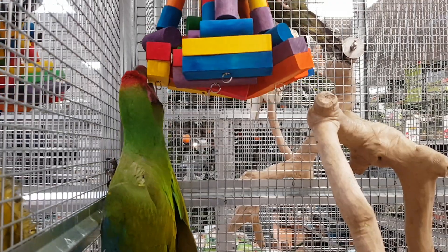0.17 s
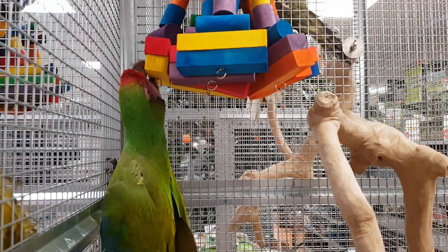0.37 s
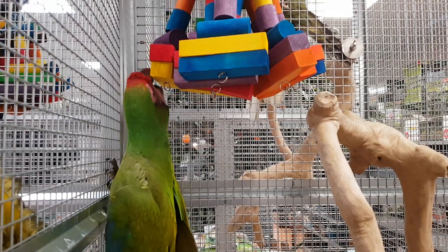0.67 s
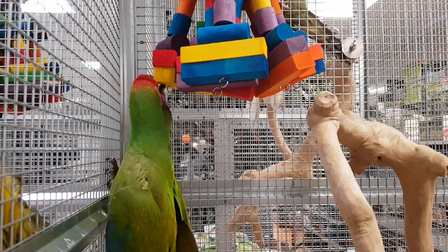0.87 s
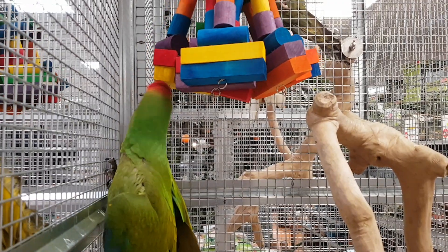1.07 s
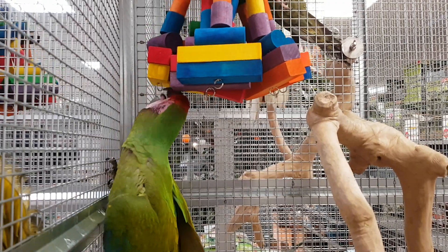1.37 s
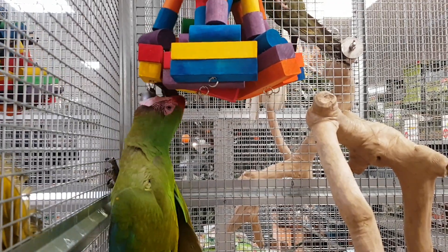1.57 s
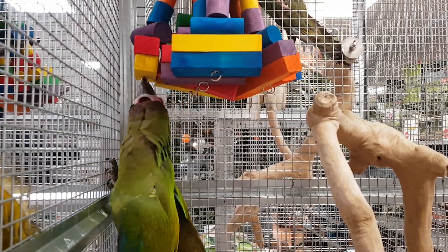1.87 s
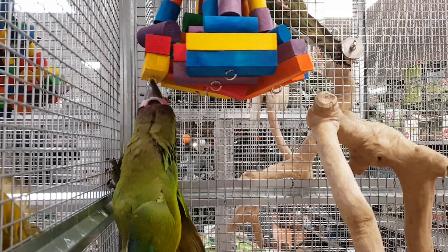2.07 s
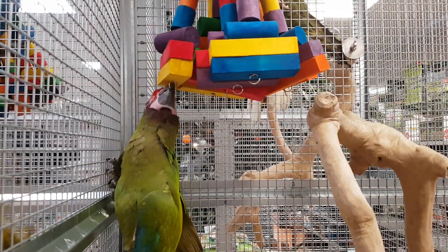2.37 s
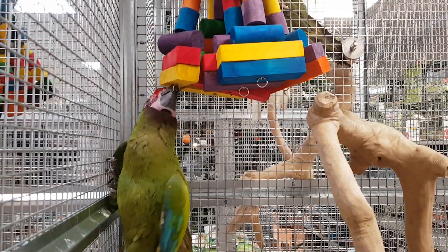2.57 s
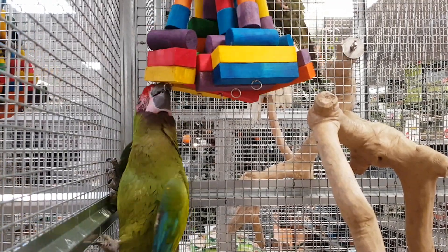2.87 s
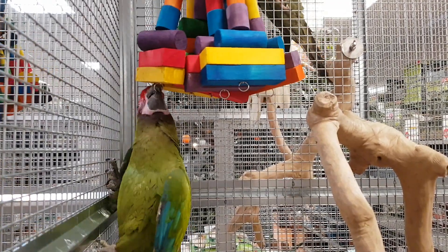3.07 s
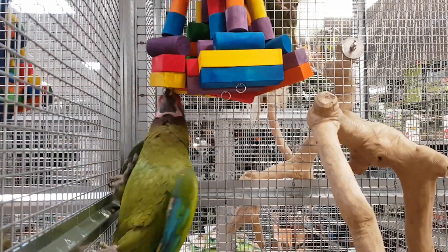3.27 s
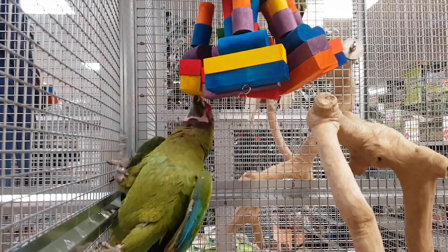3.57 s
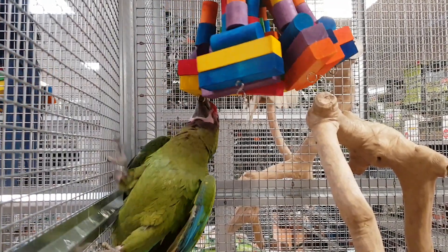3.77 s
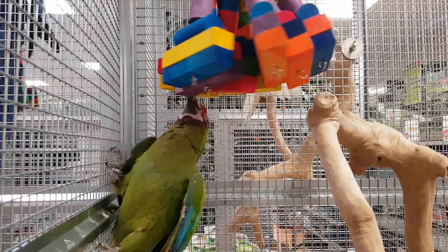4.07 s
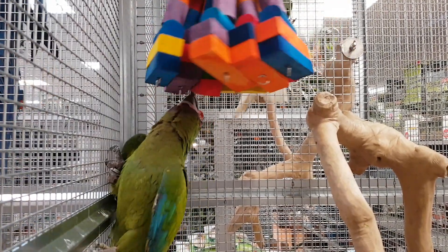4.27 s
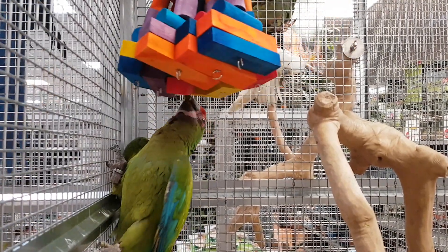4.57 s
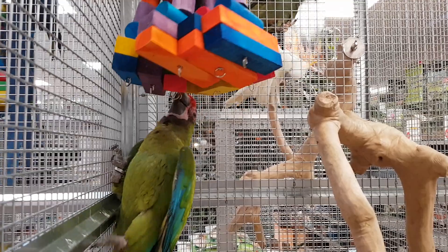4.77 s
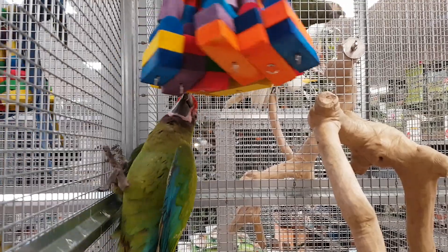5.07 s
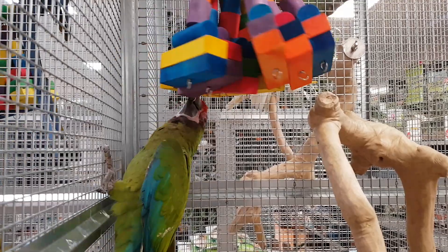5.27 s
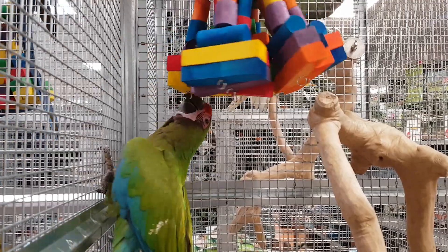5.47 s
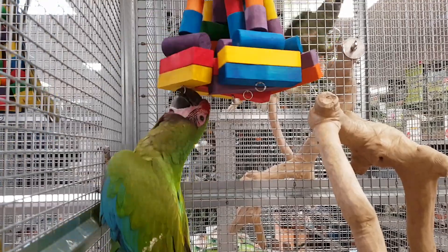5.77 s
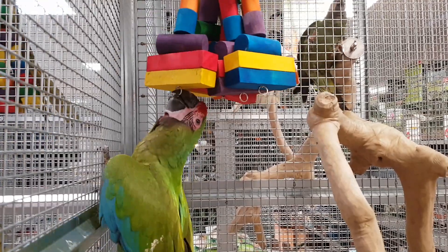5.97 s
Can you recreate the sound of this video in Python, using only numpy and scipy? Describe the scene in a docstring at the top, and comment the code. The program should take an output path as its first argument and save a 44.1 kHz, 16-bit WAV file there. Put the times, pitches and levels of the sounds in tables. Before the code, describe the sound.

In a bare indoor aviary, rough parrot squawks follow one another closely, some near the stereo microphones and some deeper in the room. Light, scratchy clicks and knocks of a beak and claws on wood and cage wire gradually take over, broken by a few more squawks and brief parakeet whistles. A fine rustle rises near the end, over a quiet fan hum and a murmur of far birds.

```python
"""Parrots squawk and mutter, near and far, in a bare indoor aviary. Each call follows the source-filter
principle: irregular pulses of the vocal folds and breath noise excite the resonances of windpipe and beak.
Small parakeets whistle thinly, and a beak and claws click on wooden toy blocks and cage wire.
Behind them lie a humming fan, distant chatter and a fine rustle. The walls add a short reverberation,
and a spaced pair of microphones receives the sounds with differences of time and level."""
import sys
import numpy as np
from scipy import signal
from scipy.fft import rfft, irfft, next_fast_len
from scipy.io import wavfile
from scipy.ndimage import uniform_filter1d, map_coordinates

SR = 44100
rng = np.random.default_rng(int(sys.argv[2]) if len(sys.argv) > 2 else 0)


def transcribe(u):
    """Save the signal u as a 16-bit wav file named by the first command-line argument.

    u: samples, shape (n,) or (channels, n), limited to [-1, 1]; the rate is SR.
    q: integer samples, one column per channel.
    """
    v = np.clip(np.atleast_2d(u).T, -1, 1)
    q = np.round(v * 32767).astype(np.int16)
    wavfile.write(sys.argv[1], SR, q)


N = 270200

# Reverberation of the walls. Each row: frequency in Hz, time to decay by 60 dB in seconds.
WALL_T60 = [(300, 0.12), (2000, 0.27), (6000, 0.22), (14000, 0.084)]
# Likeness of the diffuse noise at the two microphones. Each row: frequency in Hz, coherence from 0 to 1.
COHERENCE = [(25, 1), (60, 0.1), (150, 0.9), (300, 0.92), (600, 0.58), (1200, 0.0057), (15000, 0.0074)]
# Spectra of the background noises. Each row: frequency in Hz, relative level in dB.
FAN_SPECTRUM = [(12, -55), (20, -16), (98, -5), (129, -9.5), (312, -9.5), (409, -18), (431, -12),
                (955, -22.5), (1500, -52), (1950, -68), (3300, -120)]
CHATTER_SPECTRUM = [(350, -13), (600, -5.5), (1410, -1.5), (2640, 0), (4060, -11.5), (5940, -23),
                    (7000, -14), (9100, -37), (15400, -120)]
RUSTLE_SPECTRUM = [(2350, -12.5), (4000, -4.5), (4290, -9), (5480, -4), (7280, -16), (15400, -12),
                   (16500, -13)]
# Their envelopes. Each row: time in seconds, base level in dB.
FAN_LEVELS = [(0, -44), (.15, -63), (.5, -52), (1.3, -46), (5.9, -46), (6.13, -40)]
CHATTER_LEVELS = [(0, -45), (1.3, -43), (1.7, -60), (2.6, -50), (2.95, -42.5), (3.35, -44), (4.1, -48),
                  (4.4, -45.5), (4.8, -46), (5.1, -42), (6.13, -42)]
RUSTLE_LEVELS = [(0, -58.5), (1.5, -53.5), (2.6, -55.5), (2.9, -49), (4.7, -53), (5.0, -44), (5.3, -37),
                 (5.6, -39.5), (6.13, -48)]

# Contacts of beak and claws. Each row: start in seconds, relative level in dB, gain of wood and wire
# in dB, gain of the fizz in dB, nominal time to decay by 60 dB in seconds.
CONTACTS = [(1.4026, -41, -2, -18, .1), (1.474, -40, 17.5, 1, 0.29), (1.5106, -54, 24, -9, 0.16),
            (1.8827, -48, 18, 1, 0.72), (2.208, -44.5, 15, -8, .12), (2.3134, -33.5, -3, -12, 0.31),
            (2.743, -47, -4, -3, .068), (2.8178, -32.5, 4, -8, 0.15), (2.855, -29, 7, 0.5, 0.23),
            (2.8919, -29.5, 14.5, -22, 0.14), (3.038, -24, 3.5, -1, 0.18), (3.2837, -61, -12, -3, 0.16),
            (3.3638, -42, -9, -7, .17), (3.4036, -37, 7, -9, .13), (3.436, -29, 10, -13, .15),
            (3.6845, -17, 2.5, -12, .18), (3.8383, -29, 3.5, -6, 0.2), (3.8689, -23, 0.5, -4, 0.22),
            (3.9844, -32, -11, -22, 0.082), (4.003, -27.5, 5.5, -12, 0.15), (4.0723, -37, 11, -29, 0.082),
            (4.127, -53, -3, 14.5, 0.19), (4.203, -38.5, 3, -6, 0.21), (4.7212, -37, -14, -21, 0.033),
            (4.798, -39, -3, 0, 0.093), (4.819, -30.5, 2, -7, .17), (4.8506, -32.5, 2, 5, 0.52),
            (5.2854, -25, 7, -7, .19), (5.3231, -26, -12, 6, 0.056), (5.3854, -24, 5, -4.5, 0.089),
            (5.466, -35.5, 13.5, 0, 0.3), (5.4953, -21.5, 2.5, .5, 0.16), (5.527, -27.5, -4, -7, 0.26),
            (5.684, -23.5, 3, -3, 0.31), (5.721, -22, 4.5, -4, 0.22), (5.7743, -30, 18, -21, 0.1),
            (5.7888, -41, 2, 7.5, 0.11), (5.8763, -34.5, 15.5, -33, 0.094), (5.968, -27.5, -5, -17, .2)]
# Spectra of the parts of a contact. Each row: frequency in Hz, relative level in dB.
TICK_SPECTRUM = [(2350, -13), (4000, 8), (7660, 6), (9380, -7), (10500, -2), (13600, -1), (22000, -120)]
FIZZ_SPECTRUM = [(5880, -62), (10000, -6), (15000, 2), (15900, -31), (16500, -22)]
WOOD_SPECTRUM = [(470, -74), (800, -17), (1150, -9.5), (2290, 3.5), (3460, 0), (4320, -7.5), (5140, -11.5),
                 (8000, -7.5), (10400, -54), (17600, -120)]
# Modes of cage wire and toy chain. Each row: mean frequency in Hz, relative level in dB,
# time to decay by 60 dB in seconds (capped at 0.1 when sounded).
WIRE_MODES = [(2500, -12, 0.26), (4900, -8, 0.073), (4500, 4, 0.27), (5220, -1, 0.38)]
# The clicking moves to the left. Each row: time in seconds, level of left over right in dB.
CONTACT_PAN = [(2.75, -1.2), (2.82, 2.5)]

# Parakeet whistles. Each row: start and length in seconds, first and last pitch in Hz, relative peak
# level in dB, level of the octave over the fundamental in dB, warble as a fraction of the pitch.
PARAKEET_WHISTLES = [(2.22, 0.089, 3640, 3450, -48.5, -30, 0.089), (2.32, 0.13, 4580, 4680, -46, -32, .074),
                     (2.82, .06, 5760, 5760, -53, -35, .01), (2.95, .08, 4560, 4650, -49, -30, .01),
                     (3.15, 0.071, 2710, 2600, -41, -35, 0.097),
                     (3.88, 0.079, 2908, 2858, -30.5, -3.5, 0.0097),
                     (3.903, 0.081, 3050, 3083, -28.5, -2, 0.012),
                     (4.22, 0.072, 2080, 1980, -48, -36, 0.016), (4.3, .08, 2610, 2640, -55, 6, .008),
                     (4.36, .11, 2690, 2680, -52, 6, .008), (4.575, .085, 2880, 2930, -50, -28, .025),
                     (4.735, .09, 2790, 2770, -51, -25, .008), (4.889, 0.079, 2690, 2337, -32, -10.5, .05),
                     (4.907, 0.084, 3157, 2980, -29, 0, 0.052)]

# Pitch of the parrots' vocal folds, one curve a call. Each point: time in seconds, pulse rate in Hz.
FOLD_RATES = [
    [(0, 337), (.14, 312.8), (.165, 290), (.2, 153)],
    [(.2, 393), (.53, 412.6)],
    [(.53, 417.3), (.69, 431)],
    [(.693, 442.5), (.72, 641.4), (.79, 615.4), (.82, 765), (1.0, 745.5)],
    [(1.1, 789), (1.25, 800)],
    [(1.265, 382), (1.285, 602.4), (1.42, 599)],
    [(1.565, 462), (1.59, 586), (1.62, 532), (1.64, 582), (1.68, 566)],
    [(1.688, 505), (1.72, 519.6), (1.8, 518)],
    [(1.77, 297), (1.82, 400.7), (1.87, 651), (1.9, 665), (1.915, 577), (1.925, 310.3), (2.05, 336.4),
     (2.12, 322.2)],
    [(2.35, 442), (2.39, 536), (2.405, 467), (2.445, 711), (2.49, 660)],
    [(2.493, 514), (2.62, 538.4), (2.76, 518)],
    [(3.2, 449.6), (3.29, 483)],
    [(3.405, 449.5), (3.425, 688.6), (3.49, 682.7), (3.52, 535), (3.645, 499), (3.67, 282), (3.69, 155)],
    [(5.01, 486.6), (5.07, 524), (5.13, 627.7), (5.18, 611), (5.245, 473.5)],
    [(5.95, 397.6), (6.12, 394)],
]
# Response of throat and beak, one curve a call. Each point: frequency in Hz, relative gain in dB.
THROAT_RESPONSES = [
    [(120, -93), (200, -47), (303, -22), (494, -2), (683, -8.5), (1130, -2.5), (2210, -3.5), (3670, -11.5),
     (4160, -21), (7550, -31.5), (9210, -44.5), (15000, -28)],
    [(180, -69), (300, -31), (409, -11.5), (1250, -1.5), (2100, -1), (2360, -5.5), (2970, -6), (5090, -12),
     (8600, -41.5), (15000, -32)],
    [(240, -82), (400, -28), (443, -45), (1300, -9), (1440, -10.5), (4890, -26.5), (6000, -49), (7800, -85),
     (13200, -120)],
    [(210, -56), (350, -43), (416, -3.5), (561, -21), (607, -14.5), (744, -10.5), (973, -8.5), (1560, 0.5),
     (4840, -12), (9660, -38.5), (15000, -37)],
    [(350, -21), (600, -11), (894, -21), (1620, -7.5), (2390, -9), (5000, -37), (6500, -58), (11000, -120)],
    [(180, -53), (300, -12), (753, -8), (1050, -12), (1230, -7), (2420, -5.5), (2630, -9.5), (8000, -34),
     (10400, -68), (17600, -120)],
    [(240, -34), (400, -59), (601, 8), (2920, -27), (5850, -24), (7000, -44), (9100, -69), (15400, -120)],
    [(240, -61), (400, -44), (508, -3.5), (821, -15), (1060, 1.5), (1250, -25), (7000, -35.5), (9100, -63),
     (15400, -120)],
    [(240, -56), (400, -3), (669, 0), (801, -2.5), (1660, -12), (2040, -30.5), (3620, -18.5), (5640, -30),
     (7000, -43), (9100, -42), (15400, -120)],
    [(210, -55), (350, -39), (568, 0), (788, -6), (1040, 0.5), (1640, -10), (2100, -11), (8000, -32),
     (10400, -69), (17600, -120)],
    [(210, -48), (350, -15.5), (789, 0.5), (876, 0.5), (1580, 1.5), (2470, 1), (4870, -11.5), (5560, -25),
     (7590, -22), (12000, -47), (15600, -79), (22000, -120)],
    [(210, -34), (350, -26), (484, -11), (633, -8), (3000, -14), (3900, -45), (6600, -120)],
    [(120, -51), (200, 1), (1460, 6), (2570, 3.5), (3560, 0), (4080, -14), (4840, -11.5), (5650, -46),
     (8090, -24), (9120, -44), (12000, -21.5), (15600, -69), (22000, -120)],
    [(240, -63), (400, -13), (607, -3), (714, -10), (1220, -1), (1500, -8), (1620, -4.5), (4830, -7),
     (8060, -24), (10000, -31), (13000, -51), (22000, -120)],
    [(150, -3), (250, 7), (402, -9), (727, -0.5), (875, 3.5), (4000, -6.5), (5200, -53), (8800, -120)],
]
# Windpipe resonances, one list a call. Each entry: centre and half-width in Hz, boost in dB.
WINDPIPE_FORMANTS = [
    [(725, 60, 15), (2190, 110, 11), (2900, 120, 7), (4080, 150, 7), (5040, 250, 5)],
    [(1620, 120, 7), (2080, 120, 6), (2800, 200, 7), (3400, 200, 6)],
    [(1310, 80, 7), (2090, 80, 7)],
    [(750, 120, 5), (1450, 150, 6), (2250, 200, 6), (3150, 150, 6), (4900, 200, 5)],
    [(1600, 150, 5)],
    [(1300, 150, 5), (2430, 100, 7), (3400, 100, 6)],
    [(3500, 150, 12), (5800, 150, 10)],
    [(3630, 150, 16), (5700, 150, 12)],
    [(1650, 150, 5)],
    [(2650, 200, 6)],
    [(900, 200, 4), (2500, 300, 4)],
    [],
    [(780, 150, 5), (1100, 150, 6), (1450, 150, 6), (2100, 150, 5), (3350, 250, 6), (4600, 300, 5)],
    [(1600, 150, 6), (8100, 400, 10)],
    [],
]
# Delivery of the calls. Each row: attack length and time of release in seconds, relative levels after
# the attack and at release in dB, fade in dB per second, first and last roughness from 0 to 1, rattle
# depth in dB, lead of the left channel in seconds, left over right in dB, reverberant over direct in dB.
CALLS = [(0, .168, -19.5, -18, 800, .15, .22, 1.2, .00045, 5.5, -9.5),
         (.01, .438, -35, -19, 800, .27, .18, 5, -.018, -1.5, 7.5),
         (.03, .652, -41, -31, 900, .27, .22, 5, .0001, -1.5, 2.5),
         (.008, .88, -26, -20.5, 280, .22, .4, 2.2, .00023, -1.5, .6),
         (.005, 1.214, -39, -38, 600, .77, .4, 5, .0002, -3, -.6),
         (.022, 1.3, -28.5, -30, 300, .15, .55, 4.5, .0002, -1.3, 6),
         (.005, 1.59, -39, -39, 150, .18, .1, 2.2, .00007, -.6, 1.2),
         (.008, 1.763, -40, -31, 540, .045, .03, .2, .00007, 0, -6.5),
         (.1, 2.04, -35, -32, 340, .05, .4, 3, .0003, -1.2, -2.5),
         (.04, 2.454, -35.5, -34, 80, .2, .18, 7, .0003, -.6, 0),
         (.003, 2.65, -25, -23, 380, .25, .65, 4.5, .0003, -.6, -2.5),
         (.005, 3.254, -44, -42, 750, .41, .64, 3, .0001, -.6, 0),
         (.025, 3.645, -23, -18, 430, .5, .4, 2.5, -.00002, .6, -15),
         (.12, 5.218, -28, -26, 630, .1, .24, .8, -.0001, -.6, -8.5),
         (.002, 5.965, -32, -33, 190, .67, .8, 2.5, -.0001, .6, 1.5)]
# Runs in which the folds catch. Each row: first and last time in seconds, number of catches, depth in dB.
FOLD_CATCHES = [(.021, .127, 5, 14), (1.982, 1.982, 1, 12), (2.528, 2.645, 4, 11), (3.471, 3.555, 3, 13),
                (3.489, 3.573, 2, 7), (3.616, 3.63, 2, 9), (5.08, 5.188, 4, 8)]


def amp(db):
    """Amplitude ratio of a level in decibels."""
    return 10 ** (np.asarray(db) / 20)


def unit_rms(x):
    """Normalisation to a mean power of one."""
    return x / np.sqrt(np.mean(x ** 2) + 1e-20)


def at_frequency(points, hz):
    """Interpolation of (frequency, value) points on a logarithmic axis."""
    knots, values = np.transpose(points)
    return np.interp(np.log(hz + 1), np.log(knots + 1), values)


def at_time(points, t):
    """Linear interpolation of (time, value) points."""
    return np.interp(t, *np.transpose(points))


def wobble(rate, size):
    """Smooth random modulation: a spline through `rate` Gaussian values a second."""
    knots = rng.standard_normal(int(size * rate / SR) + 4)
    return map_coordinates(knots, [np.arange(size) * rate / SR])


def coloured(x, spectrum, resonances=()):
    """Minimum-phase filtering by a spectral envelope with resonant peaks."""
    size = next_fast_len(x.shape[-1] + 4096)
    hz = np.fft.rfftfreq(size, 1 / SR)
    peaks_db = sum(boost / (1 + ((hz - centre) / width) ** 2) for centre, width, boost in resonances)
    gain_db = np.maximum(at_frequency(spectrum, hz), -90) + peaks_db
    cepstrum = irfft(np.log(amp(gain_db)), size)
    cepstrum[1:size // 2] *= 2  # folding onto positive time makes the filter causal
    cepstrum[size // 2 + 1:] = 0
    return irfft(rfft(x, size) * np.exp(rfft(cepstrum)), size)[..., :x.shape[-1]]


def place(out, x, start, lead_s, pan_db, room_db):
    """Superposition: adds to `out` the direct sound and an exponentially decaying tail from the walls."""
    size, margin = SR // 2, 40  # samples
    hz, t, noise = signal.stft(rng.standard_normal((2, size)), SR, nperseg=256)
    decay = amp(-60 * t / at_frequency(WALL_T60, hz)[:, None])
    tail = signal.istft(noise * decay, SR, nperseg=256)[1][:, :size]
    tail = amp(room_db) * tail / np.linalg.norm(tail[0])
    tail = np.pad(tail, ((0, 0), (SR // 300, 0)))  # reflections travel a longer path
    side, length = np.array([[.5], [-.5]]), tail.shape[1]
    delay = margin - side * lead_s * SR
    direct = irfft(np.exp(-2j * np.pi * np.fft.rfftfreq(length) * delay), length)
    response = amp(side * pan_db) * (direct + tail)
    heard = signal.fftconvolve(np.atleast_2d(x), response, axes=1)[:, margin:]
    first = round(start * SR)
    out[:, first:first + heard.shape[1]] += heard[:, :N - first] / np.sqrt(1 + amp(2 * room_db))


def diffuse_noise(spectrum, patchy_db):
    """A diffuse field: noise of rms 1, uneven in time and frequency, coherent only at low frequencies."""
    noise = signal.stft(rng.standard_normal((2, N)), nperseg=512)[2]
    patches = uniform_filter1d(rng.standard_normal(noise.shape[1:]), size=5, axis=0)
    patches = unit_rms(uniform_filter1d(patches, size=10, axis=1))
    angle = np.arccos(at_frequency(COHERENCE, np.fft.rfftfreq(512, 1 / SR)))[:, None] / 2
    mid, side = noise * amp(patchy_db * patches) * [np.cos(angle), np.sin(angle)]
    stereo = signal.istft(np.array([mid + side, mid - side]), nperseg=512)[1][:, :N]
    return unit_rms(coloured(stereo, spectrum))


def swell(levels, drive, gain_db, lag_s):
    """Incoherent powers add: the rms of a base level plus the exponentially smoothed power of `drive`."""
    base_db = at_time(levels, np.arange(N) / SR)
    pole = np.exp(-1 / (lag_s * SR))
    trailing_power = signal.lfilter([1 - pole], [1, -pole], np.mean(drive ** 2, axis=0))
    return np.sqrt(amp(2 * base_db) + amp(2 * gain_db) * trailing_power)


def fan():
    """A tone over broadband noise: mains hum at 100 Hz wavers within the fan's rumble."""
    t = np.arange(N) / SR
    hum_gain = amp(-0.5 + 1.1 * wobble(4.45, N))
    hum = hum_gain * np.sin(2 * np.pi * 100 * t + 0.5 * wobble(10, N) + [[.05], [-.05]])
    rumble = diffuse_noise(FAN_SPECTRUM, patchy_db=-0.73)
    return amp(at_time(FAN_LEVELS, t) + [[-.8], [.8]]) * (rumble + hum)


def far_chatter(calls):
    """Reverberation blurs distant birds into a murmur that swells after each call."""
    murmur = diffuse_noise(CHATTER_SPECTRUM, patchy_db=1.4)
    envelope = swell(CHATTER_LEVELS, calls, gain_db=-16.5, lag_s=0.053)
    return envelope * amp(0.34 * wobble(8, N)) * murmur


def rustle(clicks):
    """Amplitude-modulated noise: a fine rustle, stirred by each click."""
    hiss = diffuse_noise(RUSTLE_SPECTRUM, patchy_db=1.3)
    envelope = swell(RUSTLE_LEVELS, clicks, gain_db=-14, lag_s=0.074)
    return envelope * amp(0.73 * wobble(11, N)) * hiss


def wire_ring(t):
    """Free vibration: damped modes of the wire, scattered in level and pitch at each contact."""
    ring = np.zeros(len(t))
    for hz, level_db, t60 in WIRE_MODES:
        envelope = amp(level_db + rng.normal(0, 2.7) - 60 * t / min(t60, .1))
        ring += envelope * np.sin(2 * np.pi * hz * rng.normal(1, 0.0336) * t)
    return ring


def beak_and_claws():
    """Impact excitation: each contact gives a scratchy tick, a duller knock of wood and a ring of wire."""
    out, t = np.zeros((2, N)), np.arange(SR // 4) / SR
    for start, level_db, wood_db, fizz_db, t60 in CONTACTS:
        snap, fizz, wood = (unit_rms(coloured(rng.standard_normal((2, len(t))), spectrum))
                            for spectrum in (TICK_SPECTRUM, FIZZ_SPECTRUM, WOOD_SPECTRUM))
        scratch = amp(5.7 * wobble(240, len(t)) - 60 * t / t60) + 2.9 * amp(-60 * t / 0.041)
        onset = 1 - np.exp(-t / (.12 * t60 ** 2))  # long scrapes set in more softly than short snaps
        tick = (snap + amp(fizz_db + 4.5) * fizz) * scratch * onset
        knock = wood * amp(-60 * t / (1.03 * t60)) * (1 - np.exp(-t / 0.0012))
        click = amp(level_db - 11.5) * (tick + amp(wood_db) * (knock + amp(-11) * wire_ring(t)))
        place(out, click, start, lead_s=0.000147, pan_db=at_time(CONTACT_PAN, start), room_db=-4)
    return out


def parakeets():
    """Frequency and amplitude modulation make a tone of three harmonics waver, deep in the room."""
    out = np.zeros((2, N))
    for start, length, first_hz, last_hz, peak_db, octave_db, warble in PARAKEET_WHISTLES:
        progress = np.linspace(0, 1, round(length * SR))
        size = len(progress)
        hz = first_hz + (last_hz - first_hz) * progress
        level_db = peak_db + np.interp(progress, [0, 0.3, 1], [-1, 0, -23.5])
        phase = 2 * np.pi * np.cumsum(hz * (1 + warble * wobble(504.6, size))) / SR
        overtones = np.sin(2 * phase) + amp(-21) * np.sin(3 * phase)
        tone = amp(level_db + 7.5) * (np.sin(phase) + amp(octave_db) * overtones)
        flutter = amp(20 * warble * wobble(310, size))
        whistle = tone * flutter * signal.windows.tukey(size, .3)
        place(out, whistle, start, lead_s=.00003, pan_db=.9, room_db=4)
    return out


def vocal_folds(hz, roughness):
    """A vibrating valve chops the breath into uneven pulses; returns the sound and its phase in cycles."""
    jitter = 0.302 * wobble(400, len(hz))
    drift = .12 * wobble(35, len(hz))
    cycle = np.cumsum(hz * (1 + roughness * (jitter + drift))) / SR
    shimmer = amp(9 * roughness * rng.uniform(-1, 1, int(cycle[-1]) + 2)[cycle.astype(int)])
    harmonic = np.arange(1, 41)[:, None]
    # the folds peel shut, so higher overtones come later in the cycle
    partials = np.cos(2 * np.pi * harmonic * (cycle - .5 - .022 * harmonic))
    pulses = -unit_rms(np.sum(partials * (harmonic * hz < SR / 3), axis=0))
    breath = unit_rms(rng.standard_normal(len(hz)) * np.sin(np.pi * cycle) ** 4)
    return shimmer * (np.sqrt(1 - roughness ** 2) * pulses + roughness * breath), cycle


def parrots(attack_rise_db=14.5, catch_s=.003, catch_scatter_s=.002):
    """Source and filter: the folds, rattling and catching, drive the resonances of windpipe and beak."""
    out = np.zeros((2, N))
    catches = [(when + catch_scatter_s * rng.normal(), depth_db)
               for first, last, count, depth_db in FOLD_CATCHES for when in np.linspace(first, last, count)]
    for rates, call, throat, formants in zip(FOLD_RATES, CALLS, THROAT_RESPONSES, WINDPIPE_FORMANTS):
        attack, release, held_db, release_db, fade_rate, rough_in, rough_out, rattle_db, *position = call
        t = np.arange(rates[0][0], rates[-1][0], 1 / SR)
        hz = at_time(rates, t)
        source, cycle = vocal_folds(hz, roughness=np.linspace(rough_in, rough_out, len(t)))
        rattle = amp(rattle_db * wobble(108.4, len(t)))
        voice = coloured(source * rattle, throat, formants)
        # breath pressure holds the loudness steady over a few dozen cycles
        voice /= np.sqrt(np.abs(uniform_filter1d(voice ** 2, size=SR // 30)) + 1e-12)
        voice *= amp(-sum(depth_db * np.exp(-((t - when) / catch_s) ** 2) for when, depth_db in catches))
        # slackening folds let a low croak through from the chest
        croak = 0.25 * np.clip((305 - hz) / 60, 0, 1) * np.sin(2 * np.pi * cycle)
        effort_db = np.interp(t, [t[0], t[0] + attack, release],
                              [held_db - attack_rise_db, held_db, release_db])
        effort_db -= fade_rate * np.maximum(t - release, 0)
        fade_in = (t - t[0]) / .003 + (t[0] == 0)  # a call at time zero is already sounding
        fade_out = (t[-1] - t) / .01
        edges = np.clip(np.minimum(fade_in, fade_out), 0, 1)
        place(out, (voice + croak) * amp(effort_db + 4) * edges, t[0], *position)
    return out


def scene():
    """Linear superposition: the pressures of all sources add at the two microphones."""
    calls, clicks = parrots(), beak_and_claws()
    return fan() + far_chatter(calls) + rustle(clicks) + clicks + parakeets() + calls


def record(dry):
    """Soft saturation rounds off the highest peaks, and a low-pass filter limits the band."""
    size, cutoff_hz = next_fast_len(N + SR // 4), 15900
    rounded = dry / (1 + np.abs(dry) ** 5) ** (1 / 5)
    passband = np.fft.rfftfreq(size, 1 / SR) < cutoff_hz
    return irfft(rfft(rounded, size) * passband, size)[:, :N]


dry = scene()
out = record(dry)
transcribe(out)
```